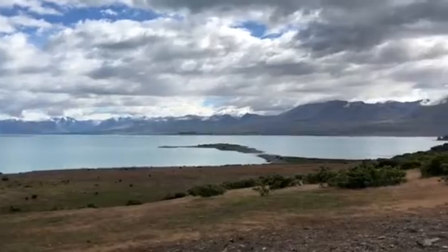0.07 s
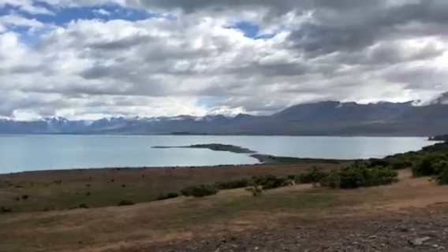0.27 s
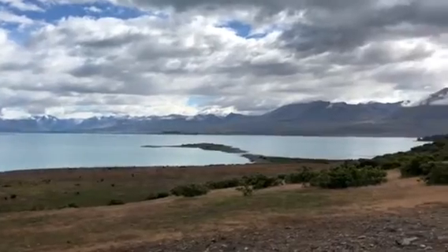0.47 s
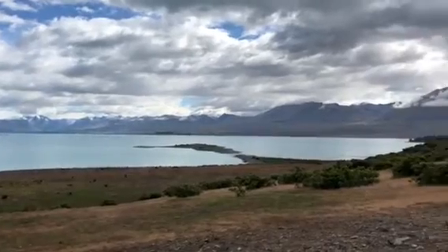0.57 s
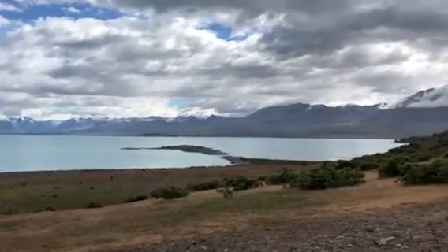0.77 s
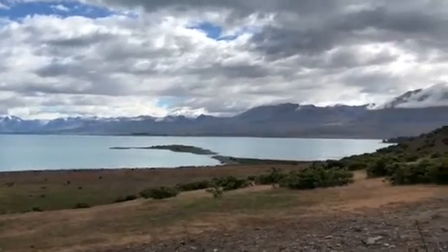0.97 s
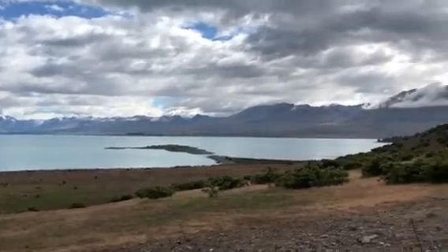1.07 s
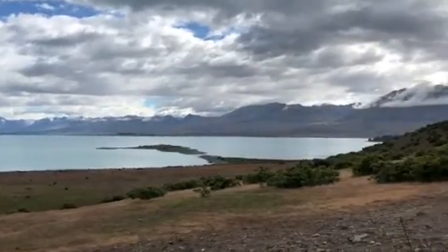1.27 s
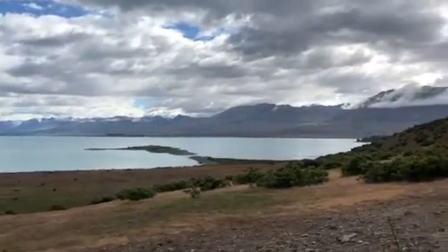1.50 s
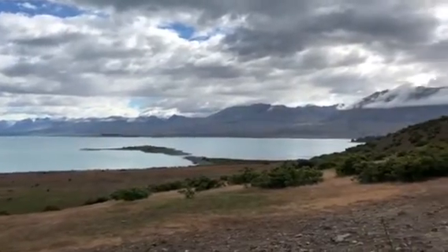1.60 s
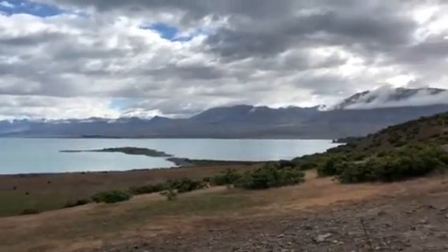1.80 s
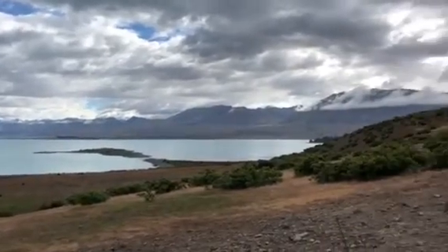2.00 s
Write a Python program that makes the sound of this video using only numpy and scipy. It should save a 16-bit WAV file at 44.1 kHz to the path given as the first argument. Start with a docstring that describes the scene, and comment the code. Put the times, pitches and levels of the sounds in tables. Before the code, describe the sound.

Faint, high birdsong of chirps and trills in open grassland, with wind buffeting the microphone.

```python
"""Larks sing over open grassland: whistles, buzzes, trills and chips overlap, each a
near sine on a pitch curve. The hillside scatters a short faint echo of the song.
Light wind rumbles on the microphone and now and then buffets it with a soft thump.
Two faint ticks and the hush of open air lie beneath."""
import sys
import numpy as np
from scipy import signal
from scipy.fft import rfft, irfft
from scipy.io import wavfile

SR = 44100
rng = np.random.default_rng(int(sys.argv[2]) if len(sys.argv) > 2 else 0)


def dump_mix(stems):
    """Bounce the given channels to the path in sys.argv[1] as a 16-bit WAV at rate SR."""
    frames = np.atleast_2d(stems).T  # one column per channel
    limited = np.clip(frames, -1, 1)  # hard clip at full scale
    pcm = np.round(limited * 32767).astype(np.int16)
    wavfile.write(sys.argv[1], SR, pcm)


N = 90404

# long whistle, warbles then arches over: [t/s, f/Hz, level/dB, warble depth/Hz]
LONG_WHISTLE = [(.338, 4450, -75, 3.5), (.362, 4110, -65.5, 29), (0.383, 4020, -64, 50),
                (.43, 4060, -62.5, 107), (0.486, 4153, -59.5, 133), (.535, 4236, -59, 87),
                (0.556, 4230, -61, 43), (0.584, 4680, -73, 0), (.608, 4420, -68, 2), (0.625, 4060, -61, 9),
                (0.644, 3690, -67, 4), (0.659, 3240, -78, -3)]
# distant trill, sinks as it swells: [t/s, f/Hz, level/dB, warble depth/Hz]
SINKING_TRILL = [(.73, 4450, -85, 200), (.79, 3920, -71, 200), (.84, 3830, -67, 130), (.89, 3650, -65, 200),
                 (.93, 3653, -65.5, 129), (.985, 3600, -61, 120), (1.012, 3660, -71, 79.5)]
# whistles: [t/s, length/s, start f/Hz, mid f/Hz, end f/Hz, level/dB, roughness/0-1]
WHISTLES = [ (-.01, 0.05, 3724, 3740, 3630, -63.5, 0.9), (0.123, 0.33, 5160, 4950, 5000, -75, 0.92),
            (0.389, 0.11, 4550, 4757, 4370, -63.5, 0.04), (0.477, 0.062, 4800, 4620, 4430, -69, 0.37),
            (0.621, 0.065, 5620, 5620, 5840, -75, 0.67), (0.686, 0.022, 4850, 5140, 5370, -67, 0.06),
            (0.704, .1, 5060, 4880, 4560, -81, 0.3), (0.84, .12, 4580, 4470, 4230, -78, .95),
            (1.078, 0.023, 4670, 4816, 4250, -59, 0.38), (1.125, .035, 2390, 2540, 2170, -72, 0),
            (1.318, 0.035, 2110, 2420, 2860, -69.5, 0.4), (1.339, 0.092, 2950, 3200, 3140, -70.5, 0),
            (1.421, 0.031, 3115, 2880, 2090, -64.5, 0), (1.307, 0.22, 4080, 4110, 4180, -80, 0.48),
            (1.495, 0.033, 3200, 3340, 3220, -65.5, .5), (1.498, 0.079, 4330, 4230, 3930, -79.5, 0.4),
            (1.698, 0.032, 5750, 5230, 5360, -77, 0.1), (1.752, 0.012, 3220, 3220, 3230, -65, 0.16),
            (1.88, 0.024, 5220, 5120, 5100, -75, 0.2), (1.965, 0.044, 5210, 5287, 5220, -66.5, 0.09),
            (1.999, 0.044, 5300, 5250, 5330, -78, 0.2)]
# quick chips: [t/s, length/s, start f/Hz, mid f/Hz, end f/Hz, level/dB]
CHIPS = [(0.086, 0.019, 5080, 5230, 5280, -67), (0.126, 0.0063, 5300, 5160, 4940, -57.5),
         (0.679, 0.008, 3820, 4620, 4860, -56.5), (0.682, 0.0094, 2640, 3350, 4350, -66.5),
         (1.07, 0.011, 5250, 5600, 4730, -66), (1.142, 0.0091, 3350, 3070, 2470, -68),
         (1.201, 0.0094, 4270, 5130, 5270, -62.5), (1.2198, 0.012, 2900, 3963, 4160, -58.5),
         (1.222, 0.012, 3510, 4040, 4330, -62.5), (1.246, 0.02, 3000, 3460, 3340, -73),
         (1.282, 0.013, 2900, 3330, 3400, -65), (1.331, 0.0237, 3140, 2888, 2780, -64.5),
         (1.69, 0.0052, 3460, 4460, 5260, -77), (1.875, 0.0074, 4020, 4950, 5400, -57.5),
         (1.8962, 0.0087, 3600, 4180, 4800, -59), (1.92, 0.0094, 3600, 4180, 4900, -62.5),
         (2.036, 0.017, 5380, 4780, 4370, -72)]
# trills: [start t/s, end t/s, period/s, chip length/s, start f/Hz, mid f/Hz, end f/Hz, level/dB]
TRILLS = [(.16, .345, .0338, .011, 5200, 5030, 4900, -66), (.324, .41, .037, .027, 3500, 3420, 3080, -71),
          (1.484, 1.67, .0348, .031, 3850, 3480, 3620, -71),
          (1.5685, 1.635, .012, .0055, 5500, 4550, 3600, -67),
          (1.5395, 1.655, .0355, .009, 2200, 2700, 3250, -72)]
# swoops: [t/s, level/dB, length/s]
SWOOPS = [(1.7353, -63, 0.021), (1.7677, -59.5, 0.021), (1.801, -58, 0.021)]
# contour of one swoop: [position/0-1, f/Hz, relative level/dB]
SWOOP_SHAPE = [(0, 5470, -16), (.13, 4630, -2), (.27, 3750, -4), (.43, 3520, -8), (.62, 3760, -4.5),
               (.77, 4600, 0), (.88, 4980, 2), (1, 5000, -16)]
# buzzes: [t/s, length/s, start f/Hz, end f/Hz, level/dB, flutter rate/Hz, flutter depth/Hz]
BUZZES = [(0.55, 0.031, 5400, 5530, -66.5, 97, 80), (0.575, 0.042, 5520, 5630, -60.5, 128, 85),
          (1.009, 0.092, 3850, 4340, -73.5, 81, 336), (1.097, 0.02, 3410, 3630, -62, 70, 200),
          (1.116, 0.043, 3787, 4326, -58, 91.7, 191), (1.243, 0.069, 2947, 2494, -71, 153, 403)]
# wind buffets: [t/s, nominal length/s, swing level/dB, start f/Hz, settling f/Hz, puff level/dB]
BUFFETS = [(0.028, 0.037, -38, 133, 58.6, -79), (0.153, 0.033, -38.5, 224, 119.6, -64.5),
           (0.171, 0.028, -33.5, 109.5, 57.4, -61.5), (0.222, 0.033, -14.5, 262.7, 42, -34.5),
           (0.299, 0.017, -26.5, 265, 125, -49.5), (0.317, 0.036, -22.5, 133.5, 49, -41),
           (.357, 0.021, -38, 256, 110, -76), (0.417, 0.0085, -34.5, 151, 89, -43),
           (.424, 0.031, -27.5, 188, 64, -46.5), (0.553, 0.015, -49, 330, 151, -74),
           (0.881, 0.032, -34, 70, 59.6, -62), (0.892, 0.0096, -35, 292, 182, -41),
           (0.969, 0.02, -28.5, 415, 118, -32.5), (0.99, 0.022, -24, 115, 71, -52),
           (0.998, 0.013, -34.5, 357, 220, -44), (1.06, 0.019, -39.5, 328, 221, -52),
           (1.066, 0.028, -27, 101, 65.4, -57.5), (1.65, 0.019, -47, 337, 187, -57),
           (1.739, 0.023, -43, 207, 135, -66), (1.832, 0.016, -33, 159, 94, -57),
           (1.87, 0.019, -29, 286, 149.6, -45.5), (2.014, 0.023, -32, 219, 95, -72),
           (2.027, 0.0061, -49, 196, 110, -42)]
# wind envelope: [t/s, rumble level/dB, flutter level/dB]
WIND_LEVELS = [(0, -52.5, -68), (.11, -57, -68.5), (.16, -43.5, -58.5), (.37, -47.5, -60.5),
               (.6, -54.5, -74), (0.736, -43.5, -60.5), (0.819, -53.5, -70.5), (0.952, -44.5, -58),
               (1.119, -50, -66), (1.26, -57, -73.5), (1.357, -54.5, -59), (1.469, -59, -74.5),
               (1.569, -55.5, -59.5), (1.7, -53.5, -58.5), (1.78, -50.5, -64), (1.941, -54, -60.5),
               (2.05, -44, -49)]
# ticks near the microphone: [t/s, level/dB]
TICKS = [(0.3406, -59.5), (1.182, -61)]
# noise spectra: [f/Hz, relative level/dB]
PUFF_SPECTRUM = [(40, -16), (150, -1.5), (300, 3), (520, -7), (680, -13.5), (900, -17.5), (1300, -33),
                 (3000, -70), (9000, -110)]
RUMBLE_SPECTRUM = [(20, -35.5), (35, -8.5), (55, 2), (85, 2.5), (130, -2.5), (200, -11.5), (320, -38.5),
                   (700, -51), (3000, -120)]
FLUTTER_SPECTRUM = [(60, -24), (130, -4), (200, 4.5), (320, -2), (500, -16), (800, -34), (1500, -43),
                    (4000, -73.5), (9000, -120)]
AIR_SPECTRUM = [(30, 6), (300, 10.5), (600, 10.5), (1000, 7), (2000, 1.5), (3000, 3), (4300, 3),
                (6300, -4.5), (10000, -7.5), (15500, -9.5)]
TICK_SPECTRUM = [(1500, 8.5), (5000, -5), (15000, -8.5)]

WHISTLE_EDGE_S, CHIP_EDGE_S, TRILL_SLIP_S = .01, .0061, .002
ROUGH_RATE_HZ, JITTER_HZ = 196, 135
GROUND_DB, GROUND_DELAY_S = -9, .0024
ECHO_DB, ECHO_T60_S, ECHO_DELAY_S = -7.5, .18, .0045
SWING_PEAK_SHARE, SLOWING_PER_LENGTH = .23, 3.45
PUFF_PEAK_S, PUFF_CUTOFF_HZ, PUFF_REF_DB, PUFF_DB_PER_OCTAVE = .0032, 940, -28, 10.5
KNOCK_HZ, KNOCK_PEAK_S = 520, .0024
GUST_DB, GUST_HZ = 2.6, 25
TICK_DECAY_S, AIR_DB, BAND_LIMIT_HZ = .0014, -74, 15750


def larks():
    """Several birds, overlapping."""
    out = np.zeros(N)
    add(out, *warble(LONG_WHISTLE, rate_hz=52, rough=.07))
    add(out, *warble(SINKING_TRILL, rate_hz=270, rough=.5))
    for start_s, length_s, *pitches_hz, db, rough in WHISTLES:
        edge_s = WHISTLE_EDGE_S + .34 * rough * length_s  # rough, distant notes fade in and out slowly
        add(out, start_s, amp(db) * glide(length_s, pitches_hz, rough, edge_s))
    for start_s, length_s, *pitches_hz, db in CHIPS:
        add(out, start_s, amp(db) * ground_bounce(glide(length_s, pitches_hz, rough=.4)))
    for start_s, end_s, period_s, length_s, *pitches_hz, db in TRILLS:
        for at_s in np.arange(start_s, end_s, period_s):
            slip_s = TRILL_SLIP_S * rng.uniform(-1, 1)
            add(out, at_s + slip_s, amp(db) * glide(length_s, pitches_hz, rough=.45))
    for start_s, db, length_s in SWOOPS:
        add(out, start_s, amp(db) * ground_bounce(swoop(length_s)))
    for start_s, *note in BUZZES:
        add(out, start_s, buzz(*note))
    return out


def warble(curve, rate_hz, rough):
    """Held note with scalloped pitch; returns start time and sound."""
    times_s, hz, db, depth_hz = np.transpose(curve)
    start_s, end_s = times_s[0], times_s[-1]
    t = np.arange(start_s, end_s, 1 / SR)
    scallop = 2 * (abs(np.sin(np.pi * rate_hz * (t - start_s))) - 2 / np.pi)  # zero mean
    tone = voice(np.interp(t, times_s, hz) + np.interp(t, times_s, depth_hz) * scallop, rough)
    envelope = amp(np.interp(t, times_s, db)) * gate(t - start_s, end_s - start_s, CHIP_EDGE_S)
    return start_s, tone * envelope


def glide(length_s, pitches_hz, rough, edge_s=CHIP_EDGE_S):
    """Note on a parabola through start, mid and end pitch."""
    t = np.arange(0, length_s, 1 / SR)
    hz = np.polyval(np.polyfit([0, .5, 1], pitches_hz, 2), t / length_s)
    return gate(t, length_s, edge_s) * voice(hz, rough)


def swoop(length_s):
    """Fast pitch dip and return."""
    position, hz, db = np.transpose(SWOOP_SHAPE)
    t = np.arange(0, length_s, 1 / SR)
    tone = voice(np.interp(t / length_s, position, hz), rough=.5)
    return tone * amp(np.interp(t / length_s, position, db)) * gate(t, length_s, edge_s=.0014)


def buzz(length_s, start_hz, end_hz, db, rate_hz, depth_hz):
    """Linear sweep; pitch and level flutter in step."""
    t = np.arange(0, length_s, 1 / SR)
    flutter = -np.cos(2 * np.pi * rate_hz * t)
    tone = voice(start_hz + (end_hz - start_hz) * t / length_s + depth_hz * flutter, rough=.27)
    return amp(db + .67 * flutter) * gate(t, length_s, CHIP_EDGE_S) * tone


def voice(hz, rough):
    """Near sine on a pitch curve; roughness (0-1) shakes level, phase and pitch."""
    size = len(hz)
    shake = unit_rms(wander(ROUGH_RATE_HZ, size) + 1j * wander(ROUGH_RATE_HZ, size))
    jitter_hz = rough * JITTER_HZ * wander(ROUGH_RATE_HZ, size)
    carrier = np.exp(2j * np.pi * np.cumsum(hz + jitter_hz) / SR)
    return ((np.sqrt(1 - rough ** 2) + rough * shake) * carrier).real


def ground_bounce(note):
    """One ground reflection blurs a quick note."""
    lag = round(GROUND_DELAY_S * SR)
    return np.pad(note, (0, lag)) + amp(GROUND_DB) * np.pad(note, (lag, 0))


def hillside_echo(song):
    """Short scatter off grass, stones and bushes."""
    t = np.arange(SR // 2) / SR
    taps = rng.standard_normal(len(t)) * (rng.random(len(t)) < .05)
    taps *= (t > ECHO_DELAY_S) * amp(-60 * t / ECHO_T60_S)
    return amp(ECHO_DB) * signal.fftconvolve(song, taps / np.linalg.norm(taps))[:N]


def buffets():
    """Eddies hit the microphone: dull puff, pressure swing that slows as it dies."""
    out = np.zeros(N)
    for start_s, length_s, db, start_hz, settle_hz, puff_db in BUFFETS:
        t = np.arange(0, 2 * length_s, 1 / SR)
        hz = settle_hz + (start_hz - settle_hz) * np.exp(-SLOWING_PER_LENGTH * t / length_s)
        swing = -amp(db) * np.sin(2 * np.pi * np.cumsum(hz) / SR) * pulse(t, SWING_PEAK_SHARE * length_s)
        puff = amp(puff_db) * puff_noise(puff_db)[:len(t)] * pulse(t, PUFF_PEAK_S)
        # square law: only the hardest buffets knock in the microphone's opening
        knock = amp(2 * db - 5) * np.sin(2 * np.pi * KNOCK_HZ * t) * pulse(t, KNOCK_PEAK_S)
        add(out, start_s, (swing + puff + knock) * gate(t, t[-1], edge_s=.0018))
    return out


def puff_noise(db):
    """Low-passed air noise; a harder eddy is brighter."""
    cutoff_hz = np.clip(PUFF_CUTOFF_HZ * 2 ** ((db - PUFF_REF_DB) / PUFF_DB_PER_OCTAVE), 100, 4000)
    lowpass = signal.butter(2, cutoff_hz, fs=SR, output="sos")
    return unit_rms(signal.sosfilt(lowpass, noise(PUFF_SPECTRUM)))


def wind():
    """Gusty rumble at the microphone, lighter flutter above it."""
    times_s, rumble_db, flutter_db = np.transpose(WIND_LEVELS)
    t = np.arange(N) / SR
    gusts = amp(GUST_DB * wander(GUST_HZ, N))
    rumble = noise(RUMBLE_SPECTRUM) * amp(np.interp(t, times_s, rumble_db))
    flutter = noise(FLUTTER_SPECTRUM) * amp(np.interp(t, times_s, flutter_db))
    return gusts * (rumble + flutter)


def ticks():
    """Tiny dry clicks of decaying noise."""
    envelope, t = np.zeros(N), np.arange(SR // 20) / SR
    for start_s, db in TICKS:
        add(envelope, start_s, amp(db) * np.exp(-t / TICK_DECAY_S))
    return envelope * noise(TICK_SPECTRUM)


def air():
    """Steady hush of open air."""
    return amp(AIR_DB) * noise(AIR_SPECTRUM)


def noise(spectrum):
    """Shaped noise, rms 1."""
    hz, db = np.transpose(spectrum)
    gain = amp(np.interp(np.log(np.fft.rfftfreq(N, 1 / SR) + 1), np.log(hz), db))
    return unit_rms(irfft(rfft(rng.standard_normal(N)) * gain, N))


def wander(cutoff_hz, size):
    """Smooth random motion, rms about 1."""
    fft_size = N if size > 2 ** 14 else 2 ** 14
    hz = np.fft.rfftfreq(fft_size, 1 / SR)
    spectrum = rfft(rng.standard_normal(fft_size)) / np.sqrt(1 + (hz / cutoff_hz) ** 8)
    return unit_rms(irfft(spectrum))[:size]


def gate(t, length_s, edge_s):
    """Soft attack, hold, soft release."""
    return np.sin(np.pi / 2 * np.clip(np.minimum(t, length_s - t) / edge_s, 0, 1))


def pulse(t, peak_s):
    """Rise to 1, exponential tail."""
    return t / peak_s * np.exp(1 - t / peak_s)


def amp(db):
    """dB to gain."""
    return 10 ** (np.asarray(db) / 20)


def unit_rms(x):
    """Scale to rms 1."""
    return x / np.sqrt(np.mean(abs(x) ** 2) + 1e-20)


def add(mix, start_s, sound):
    """Mix in place, cropped to fit."""
    at = round(start_s * SR)
    sound = sound[max(-at, 0):]
    part = mix[max(at, 0):][:len(sound)]
    part += sound[:len(part)]


def scene():
    """Larks, echo, wind, ticks and air; mono."""
    song = larks()
    return (song + hillside_echo(song) + wind() + buffets() + ticks() + air())[None]


def record(dry):
    """Recorder band limit."""
    lowpass = signal.firwin(511, BAND_LIMIT_HZ, window=("kaiser", 9), fs=SR)
    return signal.oaconvolve(dry, lowpass[None], "same")


dry = scene()
out = record(dry)
dump_mix(out)
```